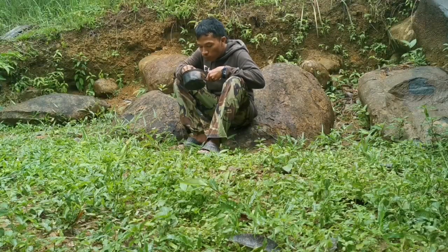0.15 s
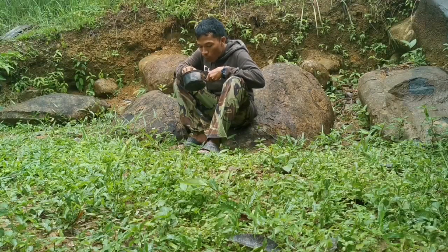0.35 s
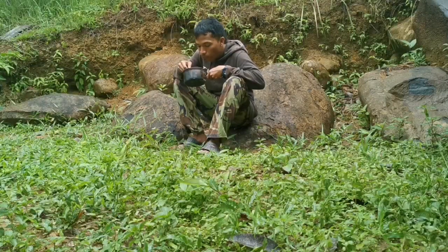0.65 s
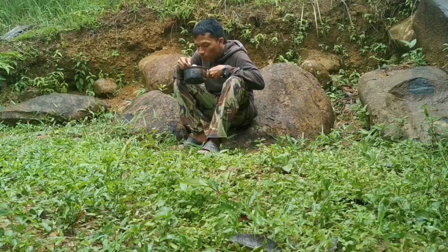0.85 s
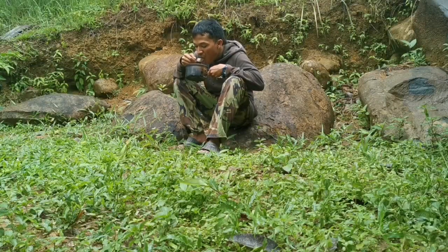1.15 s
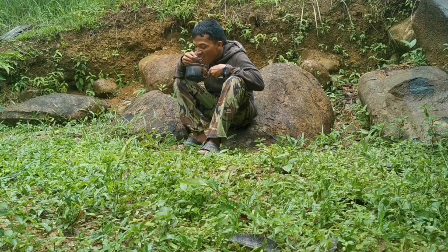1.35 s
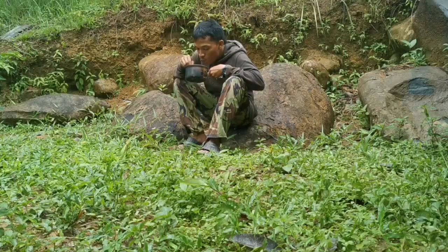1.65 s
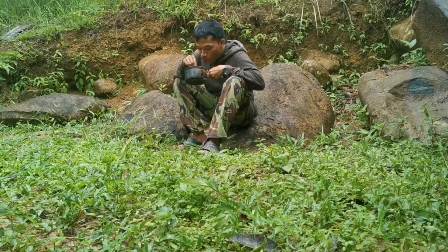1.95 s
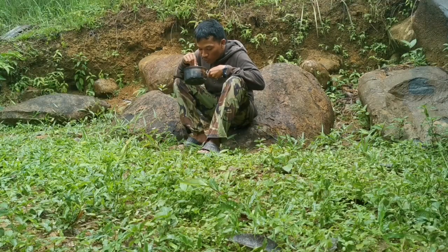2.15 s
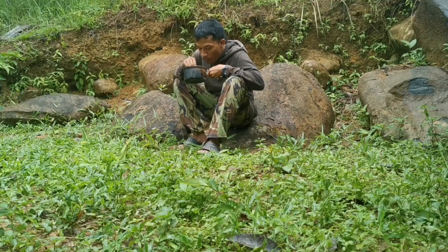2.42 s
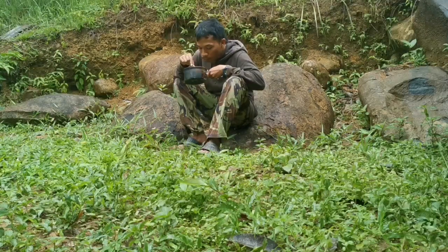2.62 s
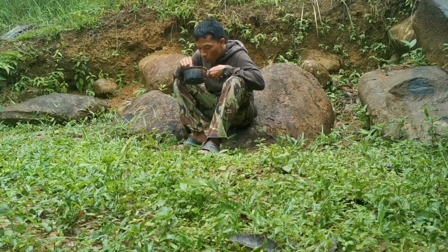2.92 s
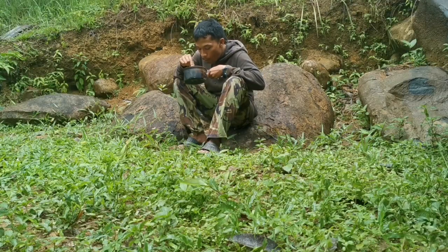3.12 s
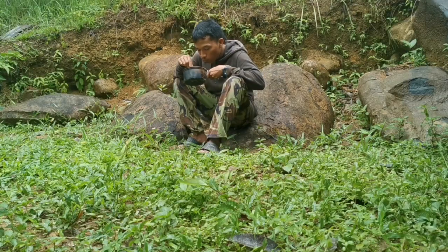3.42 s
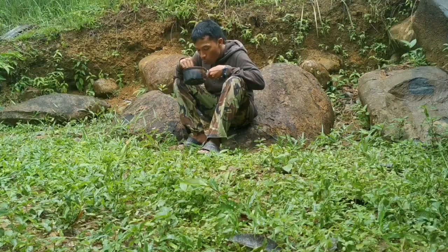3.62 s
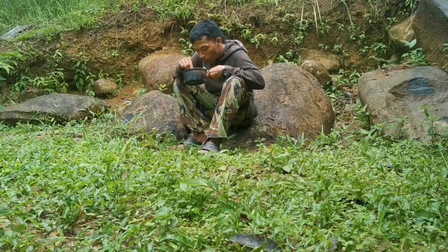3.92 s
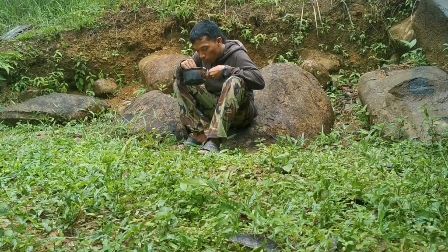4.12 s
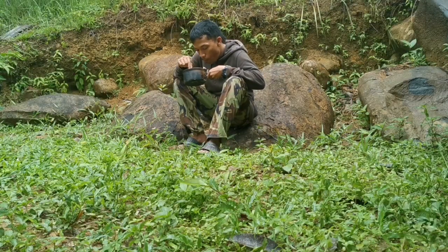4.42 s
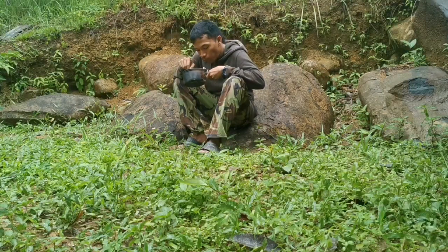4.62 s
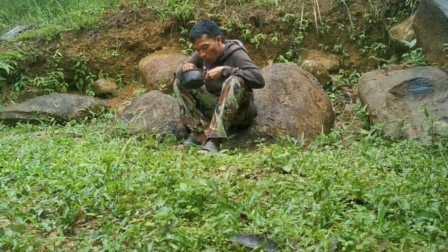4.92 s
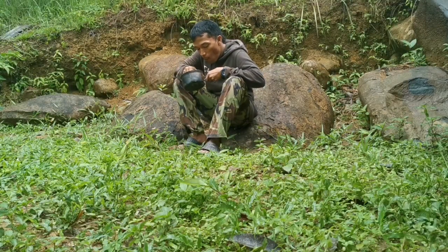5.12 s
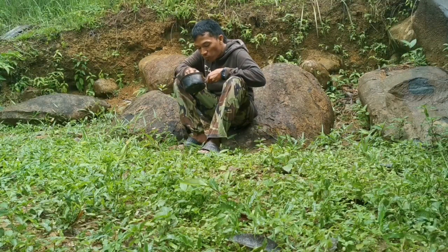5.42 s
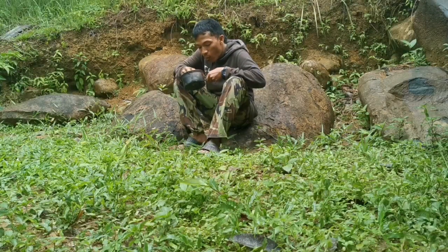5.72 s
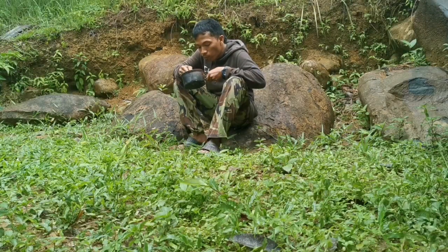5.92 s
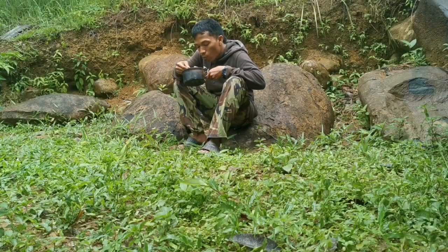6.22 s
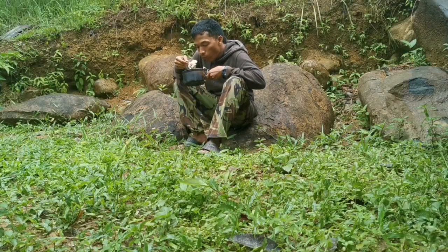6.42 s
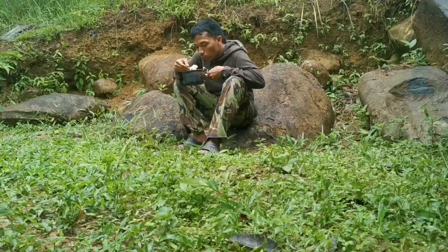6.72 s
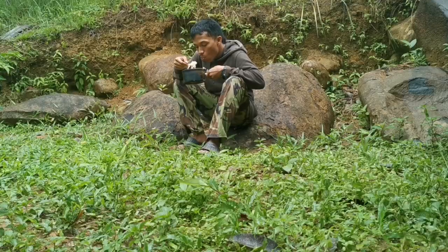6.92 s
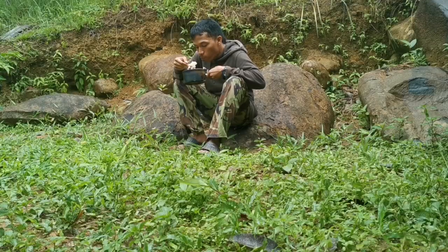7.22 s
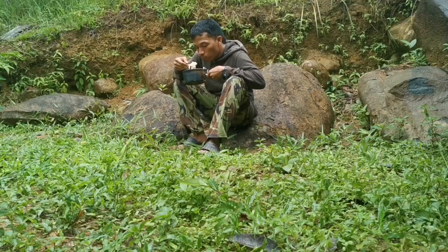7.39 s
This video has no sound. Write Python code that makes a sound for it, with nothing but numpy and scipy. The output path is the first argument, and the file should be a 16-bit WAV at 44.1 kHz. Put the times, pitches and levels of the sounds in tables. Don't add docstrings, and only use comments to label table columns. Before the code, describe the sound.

A quiet, wide stereo forest edge, heard from a camera microphone. From 0 s katydids give rough, buzzy chirps near 5 kHz, about four per second, running to the end over a soft, high, far insect chorus and thin distant cicadas. At 0.1 s a near cicada begins a piercing whine around 12.5 kHz with fainter lower overtones, beaded and flickering between ears, sliding slightly down until 3.25 s. It collapses into a noisy rasp fading by about 4 s. It returns at 4.6 s, gliding upward to the end at 7.5 s. A distant engine hums near 100 and 200 Hz, strongest around 1.5-3.6 s, over low traffic rumble. Two tiny high bird peeps sound on the right at 1.0 and 1.3 s. Soft, dull spoon-and-pot contacts occur near 0.8, 1.5, 1.9, 2.5, 4.3 (a sharper double tick), 6.8 and 7.5 s.

```python
import sys
import numpy as np
from scipy import signal
from scipy.fft import rfft, irfft, next_fast_len
from scipy.io import wavfile
from scipy.ndimage import uniform_filter1d, map_coordinates

SR = 44100
rng = np.random.default_rng(int(sys.argv[2]) if len(sys.argv) > 2 else 0)


def unload_wav(signal):
    wavfile.write(
        sys.argv[1],
        SR,
        np.round(np.clip(np.atleast_2d(signal).T, -1, 1) * 32767).astype(np.int16),
    )


def voltage_ratio(level):
    return 10 ** (np.asarray(level, float) / 20)


N = 332999
T = np.arange(N) / SR


def unit(x):
    return x / np.sqrt(np.mean(x ** 2, axis=-1, keepdims=True) + 1e-20)


def curves(rows):
    s, *cols = np.transpose(rows)
    return [np.interp(T, s, c) for c in cols]


def sounding(rows, fade):
    return np.clip(np.minimum(T - rows[0][0], rows[-1][0] - T) / fade + 1, 0, 1)


def swells(rows, rest_db):
    s, half, *db = np.transpose(rows)
    coarse = T[::64]
    bells = np.exp(-.5 * ((coarse - s[:, None]) / half[:, None]) ** 2)
    return np.array([np.interp(T, coarse, g) for g in voltage_ratio(rest_db) + voltage_ratio(db) @ bells])


def wobble(rate):
    knots = rng.standard_normal((2, int(N * rate / SR) + 4))
    return np.array([map_coordinates(k, [T * rate]) for k in knots])


def scattered(turns, rate):
    return np.cos(2 * np.pi * turns) * wobble(rate) + np.sin(2 * np.pi * turns) * wobble(rate)


def filtered(x, response):
    m = next_fast_len(N + 8192)
    return irfft(rfft(x, m) * response(np.fft.rfftfreq(m, 1 / SR)), m)[..., :N]


def resonance(hz, centre_hz, width_hz):
    return 1j * hz * width_hz / (centre_hz ** 2 - hz ** 2 + 1j * hz * width_hz)


def rush(spectrum, patchy_db):
    z = signal.stft(rng.standard_normal((2, N)), nperseg=512)[2]
    field = uniform_filter1d(rng.standard_normal(z.shape[1:]), size=6, axis=0)
    field = uniform_filter1d(field, size=14, axis=1)
    pair = signal.istft(z * voltage_ratio(patchy_db * field / field.std()), nperseg=512)[1][:, :N]
    f, db = np.transpose(spectrum)
    return unit(filtered(pair, lambda hz: voltage_ratio(np.interp(np.log(hz + 1), np.log(f), db, -120, -120))))


def lean(hz):
    return voltage_ratio(np.array([[.4], [-.6]]) * 850 / np.maximum(hz, 90))


def forest():
    # frequency in Hz, level in dB per Hz; the same for all three spectra
    rumble_spectrum = [(12, -29), (20, -7.5), (97, 0.5), (236, -4.5), (286, -4.5), (387, -11), (461, -14.5),
                       (558, -19), (644, -19), (900, -28.5), (1170, -30), (1980, -120)]
    chorus_spectrum = [(3600, -40), (3850, -19), (4150, -6), (4500, -6), (4800, -10), (5300, -14),
                       (5600, -19), (5950, -7), (6200, -.5), (6550, 0), (7350, -2.5), (7650, -18),
                       (8200, -40)]
    air_spectrum = [(300, -2.5), (600, -2), (1300, -5), (2200, -2.5), (3000, -2.5), (3700, -5), (8000, -7),
                    (10500, -8.5), (11700, -8), (12400, 2.5), (13000, -8), (13600, -10.5)]
    # time in seconds, rumble level in dB, chorus level in dB
    ambience = [(0.0, -67.5, -66), (0.67, -66, -69.5), (0.84, -68, -68), (3.07, -67, -68), (3.34, -64, -67),
                (4.81, -66, -68), (5.36, -68.5, -68.5), (7.55, -68.5, -68)]
    rumble_db, chorus_db = curves(ambience)
    common, own = rush(rumble_spectrum, patchy_db=1.5)
    rumble = voltage_ratio(rumble_db + 6.5) * np.array([1.06 * common + 0.43 * own, 0.64 * common - 0.28 * own])
    chorus = voltage_ratio(chorus_db + 7.5) * voltage_ratio([[1.2], [-1.2]]) * rush(chorus_spectrum, patchy_db=0.04)
    air = voltage_ratio(-61.5) * voltage_ratio([[.4], [-.4]]) * rush(air_spectrum, patchy_db=1.4)
    return rumble + chorus + air


def engine():
    # time in seconds, frequency in Hz
    firing_rate = [(0, 98.76), (.8, 99.53), (1.5, 100.8), (2.2, 103.7), (3, 104.9), (4, 105.8),
                   (4.8, 105.4), (5.5, 105.8), (6.5, 101.2), (7.55, 97.8)]
    # swell centre in seconds, half length in seconds, engine order, level in dB
    order_swells = [(0.385, 0.7, 1, -63.5), (0.582, 0.047, 1, -62.8), (0.994, 0.066, 1, -63),
                    (1.558, 0.27, 1, -54.5), (2.564, 0.3, 1, -61), (3.778, 0.36, 1, -57.5),
                    (4.655, 0.14, 1, -62), (5.151, 0.052, 1, -66), (5.914, 0.13, 1, -68.5),
                    (6.806, 0.06, 1, -61), (7.2, 0.033, 1, -64.5), (0.058, 0.12, 2, -60.5),
                    (1.34, 0.14, 2, -57), (1.74, 0.14, 2, -56), (2.274, 0.15, 2, -52),
                    (2.66, 0.062, 2, -55.5), (2.837, 0.09, 2, -51.5), (3.32, 0.12, 2, -50.5),
                    (3.6, 0.081, 2, -54.5), (3.939, 0.042, 2, -57), (4.44, 0.48, 2, -60.5),
                    (5.201, 0.096, 2, -64.5), (.47, 0.062, 2, -70), (6.4, 0.13, 2, -74.5),
                    (5.952, 0.077, 2, -63), (3.22, 0.046, 3, -70), (3.392, 0.02, 3, -61),
                    (3.539, 0.021, 3, -61), (3.936, 0.58, 3, -70), (4.315, 0.025, 3, -62),
                    (4.66, 0.025, 3, -74), (5.88, 0.026, 3, -65)]
    rate, = curves(firing_rate)
    turns = np.cumsum(rate) / SR
    gains = []
    for k in range(1, 4):
        rows = [(s, half, db) for s, half, order, db in order_swells if round(order) == k]
        gains.append(swells(rows, rest_db=-77)[0])
    gains.append(gains[-1] * voltage_ratio(-10.5))
    out = np.zeros((2, N))
    for k, gain in enumerate(gains, 1):
        drift, flutter = wobble(14)
        tone = np.sin(2 * np.pi * k * turns + 0.54 * drift)
        out += lean(k * rate) * np.sqrt(2) * gain * voltage_ratio(1.8 * flutter) * tone
    return out


def traffic():
    # start in seconds, end in seconds, start frequency in Hz, end frequency in Hz, level in dB
    hums = [(0, 7.55, 54, 60, -69), (.4, 1.1, 145, 140, -67), (2.3, 4.8, 142, 140, -70),
            (3.2, 5, 345, 343, -69), (4.9, 6.5, 152, 140, -66.5), (5.78, 5.96, 272, 270, -63),
            (6.3, 7.6, 288, 270, -68.5), (5.75, 6.05, 308, 303, -65), (6.95, 7.6, 112, 112, -66),
            (.45, .9, 297, 301, -70), (6.3, 7.2, 302, 294, -72)]
    out = np.zeros((2, N))
    for start, end, start_hz, end_hz, db in hums:
        hz = np.interp(T, [start, end], [start_hz, end_hz])
        turns = np.cumsum(hz) / SR
        hum = 0.94 * np.sin(2 * np.pi * turns) + 0.26 * scattered(turns, 8)[0]
        out += lean(hz) * voltage_ratio(db) * sounding([[start], [end]], fade=0.039) * hum
    return out


def far_cicadas():
    # time in seconds, tymbal rate in Hz, level of the shrill tone in dB
    singers = [
        [(0, 350, -72), (1.2, 343.6, -75), (2.5, 348.5, -65.5), (3.7, 345.5, -72), (4.6, 347, -82),
         (5.4, 350, -79)],
        [(2.4, 348.3, -74), (3.2, 350.4, -97), (4.2, 345, -75.5), (4.6, 348, -70), (5.2, 345.3, -72),
         (5.8, 347.6, -84)],
    ]
    # multiple of the tymbal rate, level in dB
    far_tones = [(9, -6), (18, -12), (36, 5), (37, -6)]
    out = np.zeros((2, N))
    for rows in singers:
        rate, level_db = curves(rows)
        turns = np.cumsum(rate) / SR
        song = sum(voltage_ratio(level_db + db) * scattered(round(k) * turns, 16) for k, db in far_tones)
        out += sounding(rows, fade=0.091) * song
    return out


def rasp():
    # time in seconds, level in dB
    rasps = [
        [(0, -69), (.1, -71.5), (.25, -83)],
        [(3.15, -83), (3.3, -62.5), (3.5, -65.5), (3.7, -68.5), (3.95, -81), (4.3, -84)],
    ]
    # frequency in Hz, width in Hz, level in dB
    abdomen = [(3070, 260, 2), (6240, 360, 4), (8900, 470, -7.5), (12240, 480, 7)]
    tuning = [1.03, 1]

    def body(hz):
        return sum(voltage_ratio(db) * resonance(hz, centre, width) ** 2 for centre, width, db in abdomen)

    grit = voltage_ratio(0.99 * wobble(13))
    noise = rng.standard_normal((2, N))
    out = np.zeros((2, N))
    for rows, tune in zip(rasps, tuning):
        voiced = unit(filtered(noise, lambda hz: body(hz / tune)))
        out += sounding(rows, fade=0.014) * voltage_ratio(curves(rows)[0] + 9.0) * grit * voiced
    return out


def katydid():
    # middle of the chirp in seconds, level in dB, middle frequency in Hz
    chirps = [(.1, -55, 4980), (.33, -54.5, 4990), (.56, -55.5, 5000), (.8, -54, 4950), (1.02, -53.5, 4970),
              (1.27, -56.5, 4950), (1.52, -55, 4830), (1.76, -53.5, 5000), (2.01, -62, 4800),
              (2.25, -57, 4850), (2.46, -60, 4940), (2.63, -60, 4800), (2.78, -55, 4750),
              (3.02, -53.5, 4750), (3.27, -55, 4750), (3.52, -55.5, 4732), (3.75, -55, 4613),
              (3.97, -67, 4700), (4.16, -56.5, 5040), (4.37, -55, 4950), (4.58, -54.5, 4900),
              (4.8, -56, 4982), (5.01, -53.5, 4930), (5.22, -54.5, 5000), (5.451, -55.5, 4950),
              (5.7, -54.5, 4900), (6.05, -61, 4850), (6.27, -59, 4940), (6.481, -59, 4900),
              (6.72, -59, 4820), (6.9, -54.5, 4776), (7.14, -55, 4790), (7.38, -56.5, 4800)]
    # time in seconds, level in dB
    crowd_level = [(0, -71), (.8, -67.5), (1.8, -66.5), (2.4, -71.5), (3.8, -71), (4.4, -68.5),
                   (5.2, -70.5), (6.2, -69.5), (7.55, -67)]
    # frequency in Hz, width in Hz, level in dB
    wings = [(4620, 400, -4), (5050, 520, 0)]
    sweep_hz, stroke_apart_s, pan_db = 896, .031, 2

    def wing_response(f):
        body = sum(voltage_ratio(db) * np.abs(resonance(f, centre, width)) ** 2 for centre, width, db in wings)
        return body / (1 + (f / 5330) ** 60)

    t, late = np.arange(SR // 40) / SR, np.arange(SR // 5) / SR
    out = np.zeros((2, N + SR))
    for centre, db, hz in chirps:
        sweep = np.cumsum(hz + sweep_hz * (.5 - t / t[-1])) / SR
        stroke = np.sqrt(np.abs(np.sin(np.pi * t / t[-1]))) * np.sin(2 * np.pi * sweep)
        chirp = np.zeros(SR // 5)
        for k, (lag, loud) in enumerate(rng.standard_normal((5, 2))):
            start = round((stroke_apart_s * k + .01 + .0022 * lag) * SR)
            stroke_db = db + 2.5 - .8 * (k - 2) ** 2 + .8 * loud
            chirp[start:][:len(t)] += voltage_ratio(stroke_db) * stroke
        chirp *= .15 + 1.75 * rng.standard_normal(len(chirp))
        tail = rng.standard_normal((2, len(late))) * voltage_ratio(-60 * late / .1)
        heard = signal.fftconvolve(chirp[None], tail / np.linalg.norm(tail[0]), axes=1)
        out[:, round((centre + .4) * SR):][:, :heard.shape[1]] += heard
    near = filtered(out[:, SR // 2:][:, :N], wing_response)
    crowd = unit(filtered(rng.standard_normal((2, N)), lambda f: resonance(f, 4580, 1100) ** 3))
    crowd_gain = voltage_ratio(curves(crowd_level)[0] + 0.71 * wobble(9))
    ears = voltage_ratio(2.4 + pan_db * np.array([[1], [-1]]))
    return ears * (voltage_ratio(4) * near + crowd_gain * crowd)


def cicada():
    # time in seconds, tymbal rate in Hz
    phrases = [
        [(.11, 356.7), (.63, 354.8), (1.47, 352.1), (2.34, 349.3), (2.96, 346.2), (3.21, 344.7), (3.26, 344.7)],
        [(4.6, 338.6), (4.68, 338.8), (5.29, 341.8), (5.61, 342.8), (6.6, 347.2), (7.18, 350.9), (7.38, 353.2),
         (7.55, 354.9)],
    ]
    # multiple of the tymbal rate, level in dB below the loudest moment,
    # extra dB at the onset, dB per Hz of rate
    weak_overtones = [(10, -39, -8, .9), (25, -50, 0, 0), (26, -38, 3, -.4), (27, -41, 13, -.6),
                      (28, -40, -6, 0), (34, -46, 0, 0), (35, -32, 5, -.2), (37, -31, -4, .2),
                      (38, -34, -14, 1.1)]
    # swell centre in seconds, half length in seconds, left level in dB, right level in dB
    shrill_swells = [(.1, 0.022, -62, -56), (0.18, 0.011, -64, -48.5), (.38, 0.013, -70, -49),
                     (0.32, 0.042, -68, -40), (0.47, 0.052, -57, -45.5), (0.56, 0.023, -49, -43),
                     (0.7, 0.074, -61, -52.5), (0.85, 0.056, -71, -52.5), (1.0, 0.04, -50, -73),
                     (1.13, 0.057, -85, -44), (1.22, 0.079, -43, -85), (1.37, 0.054, -63, -46),
                     (1.5, 0.035, -85, -54), (1.6, 0.055, -49, -85), (1.74, 0.057, -65, -50.5),
                     (1.89, 0.067, -68, -47.5), (2.04, 0.058, -45, -41), (2.19, 0.037, -51, -42),
                     (2.36, 0.017, -68, -85), (2.43, 0.042, -85, -56), (2.57, 0.027, -69, -62),
                     (2.63, 0.077, -63, -85), (2.82, 0.093, -75, -51), (2.96, 0.062, -51, -54),
                     (3.14, 0.025, -51, -64), (3.13, 0.077, -67, -44.5), (4.68, 0.029, -46, -47),
                     (4.77, 0.014, -85, -42), (4.84, 0.048, -47, -50), (5.05, 0.047, -63, -51),
                     (5.1, 0.03, -50, -77), (5.27, 0.068, -45.5, -45.5), (5.46, 0.029, -49.5, -56),
                     (5.53, 0.028, -87, -52), (5.64, 0.068, -54, -51.5), (5.74, 0.018, -61, -61),
                     (5.87, 0.051, -74, -48.5), (6.0, 0.026, -85, -48), (6.19, 0.1, -53, -44),
                     (6.36, 0.023, -58, -85), (6.43, 0.031, -85, -49.5), (6.54, 0.02, -69, -69),
                     (6.61, 0.032, -77, -49.5), (6.72, 0.11, -60, -78), (6.91, 0.018, -85, -48),
                     (7.04, 0.029, -53, -42), (7.13, 0.019, -45, -40), (7.32, 0.018, -49, -55),
                     (7.31, 0.25, -69, -63), (7.54, 0.071, -71, -52)]
    low_swells = [(0.29, 0.069, -85, -64), (0.38, 0.189, -67, -85), (0.65, 0.057, -85, -77),
                  (0.89, 0.1, -65, -85), (1.1, 0.05, -64, -70), (1.2, .04, -72, -64), (1.3, 0.12, -85, -61),
                  (1.55, 0.156, -71, -59), (1.89, 0.107, -65, -73), (2.12, 0.071, -72, -64),
                  (2.29, 0.073, -65, -64), (2.51, 0.089, -62, -67), (2.76, 0.111, -56, -85),
                  (2.91, 0.051, -66, -69), (3.16, 0.124, -78, -67), (4.76, 0.123, -85, -60),
                  (4.89, 0.034, -75, -85), (5.1, 0.082, -85, -67), (5.27, 0.073, -69, -69),
                  (5.46, 0.141, -72, -72), (5.8, 0.078, -85, -69), (5.97, 0.035, -68, -72),
                  (6.08, 0.176, -83, -65), (6.4, 0.084, -64, -69), (6.61, 0.107, -53, -85),
                  (6.89, 0.102, -64, -63), (7.07, 0.055, -71, -63), (7.28, 0.058, -85, -61),
                  (7.43, .05, -66, -72), (7.6, 0.25, -66, -85)]
    drum_swells = [(0.02, 0.12, -59, -63), (0.33, 0.1, -64, -65.5), (1.01, 0.3, -65, -70),
                   (1.33, 0.057, -66, -86), (1.7, 0.29, -65, -89), (2.05, 0.079, -68, -77),
                   (2.26, 0.11, -85, -62), (2.68, 0.19, -61, -67), (3.11, 0.13, -60, -85),
                   (5.11, 0.05, -81, -85), (5.42, 0.04, -82, -84), (5.8, 0.17, -64, -85),
                   (6.28, 0.15, -66, -85), (6.7, 0.12, -63, -76), (6.96, 0.13, -85, -72),
                   (7.48, 0.26, -63, -81)]
    side_swells = [(.22, .05, -70, -62), (.36, 0.059, -69, -60), (.52, .06, -70, -61), (.9, .06, -72, -64),
                   (1.12, .06, -62, -66), (1.35, .08, -64, -70), (1.6, 0.089, -74, -57),
                   (1.9, .05, -75, -67), (2.15, 0.053, -66, -58), (2.25, 0.077, -70, -76),
                   (2.58, .06, -70, -61), (2.85, 0.063, -68, -70), (3.1, 0.09, -68, -59),
                   (5, .03, -64, -64), (5.33, .05, -64, -65), (5.85, .06, -72, -68), (6.05, 0.07, -71, -66),
                   (6.3, .06, -73, -61), (6.72, 0.047, -68, -64), (7.05, .06, -66, -57),
                   (7.3, 0.092, -69, -70)]
    third_swells = [(.1, 0.029, -76, -60), (.72, .06, -74, -85), (1.08, .04, -76, -85),
                    (2.28, .06, -86, -80), (3.17, .05, -72, -82), (5.3, .09, -76, -72),
                    (5.6, 0.13, -75, -80)]
    # time in seconds, phase of right ear over left in rad
    shrill_turning = [(.15, -1.5), (.3, -2.2), (.45, .4), (.59, .1), (.74, -1.8), (1.04, -1.6), (1.18, -.2),
                      (1.33, -1.9), (1.63, -3), (1.92, -.4), (2.07, -2), (2.22, -.5), (2.4, 1.5),
                      (3.1, 2.4), (3.25, -.3), (4.65, 1.5), (4.79, .6), (5.06, .6), (5.33, 1.4),
                      (5.46, 2.6), (5.6, .7), (5.74, -3.4), (5.87, -1.6), (6, -1.4), (6.14, -3.8),
                      (6.28, -3.7), (6.96, -7), (7.09, -7.9), (7.36, -6.6)]
    low_turning = [(.15, -2.5), (.38, -1.8), (.5, -3.3), (.75, -2.6), (.95, -4.6), (1.18, -3.9),
                   (1.44, -7.8), (1.7, -7.7), (1.9, -8.7), (2.22, -7.6), (2.73, -7.9), (2.99, -11.1),
                   (3.25, -8.4), (4.65, .1), (4.8, .4), (4.95, 2.9), (5.12, 3.2), (5.36, 3.9), (5.6, 4.4),
                   (5.82, 8.4), (5.9, 10.4), (6.08, 10.9), (6.31, 8.2), (6.55, 9.5), (6.79, 11.9),
                   (7.02, 10.6), (7.35, 10.2), (7.5, 9)]
    drum_turning = [(.1, -.6), (.4, .3), (1, -.3), (1.2, 2.6), (1.6, 2.6), (1.8, .5), (2.2, -.3), (2.7, .5),
                    (2.9, 3), (3.15, 7.3), (5.4, 1.5), (5.9, 1.6), (6.4, -1), (6.8, -.4), (7.5, -.8)]
    apart = np.array([[0], [np.pi / 2]])

    shrill = np.sqrt(2) * swells(shrill_swells, rest_db=-66)
    low = np.sqrt(2) * swells(low_swells, rest_db=-76)
    drum = np.sqrt(2) * swells(drum_swells, rest_db=-89)
    side = np.sqrt(2) * swells(side_swells, rest_db=-90)
    third = np.sqrt(2) * swells(third_swells, rest_db=-95)
    shrill_lag, low_lag, drum_lag = (
        curves(rows)[0] * [[0], [1]] for rows in (shrill_turning, low_turning, drum_turning))
    out = np.zeros((2, N))
    for rows in phrases:
        rate, = curves(rows)
        turns = np.cumsum(rate) / SR
        angle = 2 * np.pi * turns
        beads = voltage_ratio(2.4 * wobble(32)[0])
        shrill_phase = shrill_lag + .5 * wobble(4)[0] + .15 * wobble(30)
        song = shrill * beads * np.sin(36 * angle + shrill_phase)
        song += .25 * shrill * scattered(36 * turns, 28)
        low_phase = low_lag + .5 * wobble(1.26)[0] + 0.096 * wobble(9.6)
        song += low * np.sin(9 * angle + low_phase)
        song += .08 * low * scattered(9 * turns, 20)
        drum_tone = np.sin(18 * angle + drum_lag + .5 * wobble(3)[0])
        song += drum * (drum_tone + .15 * scattered(18 * turns, 12))
        song += side * np.sin(37 * angle + shrill_lag)
        song += third * np.sin(27 * angle + apart)
        fresh = np.exp(-np.abs(T - rows[0][0]) / .22)
        for k, db, onset_db, tilt in weak_overtones:
            gain = voltage_ratio(db + onset_db * fresh + tilt * (rate - 348) - 42)
            song += gain * (.7 * np.sin(k * angle + apart) + .7 * scattered(k * turns, 7))
        song += voltage_ratio(-72) * scattered(36 * turns, 500)
        skirt = filtered(rng.standard_normal((2, N)), lambda hz: resonance(hz, 12580, 710) ** 2)
        song += voltage_ratio([[-70], [-66]]) * unit(skirt)
        out += sounding(rows, fade=0.07) * song
    return out


def pot():
    # start in seconds, frequency in Hz, width in Hz, decay in seconds, peak level in dB
    ticks = [(.78, 2750, 500, .05, -55), (.77, 1000, 500, .05, -60), (1.544, 550, 700, .028, -52),
             (1.54, 2600, 900, .02, -58), (1.89, 2600, 900, .05, -62), (2.49, 700, 300, .06, -60),
             (2.31, 9500, 2500, .05, -64), (2.83, 10500, 2500, .05, -62), (2.9, 10500, 2500, .05, -64),
             (4.331, 2300, 2200, .012, -53), (4.337, 2500, 2800, .012, -50), (4.348, 3200, 700, .015, -57),
             (4.363, 3200, 700, .015, -58), (4.445, 2500, 1500, .03, -62), (6.73, 1500, 1200, .1, -62),
             (6.86, 3000, 2000, .12, -59), (7.504, 2200, 2000, .05, -52), (7.506, 4200, 1800, .04, -55)]
    out = np.zeros((2, N))
    for s, hz, width_hz, decay, db in ticks:
        age = np.clip((T - s) / decay, 0, None)
        puff = rng.standard_normal((2, N)) * age * np.exp(-4 * age)
        ring = filtered(puff, lambda f: resonance(f, hz, 0.7 * width_hz) ** 2)
        out += voltage_ratio(db + 3) * ring / np.abs(ring).max()
    return out


def bird():
    # start in seconds, length in seconds, frequency in Hz, level in dB
    peeps = [
        (1.026, 0.05, 8160, -66),
        (1.263, .065, 8200, -63.5),
    ]
    out = np.zeros(N)
    for s, length, hz, db in peeps:
        gate = np.clip(np.minimum(T - s, s + length - T) / 0.0024, 0, 1)
        out += voltage_ratio(db) * gate * np.sin(2 * np.pi * hz * T)
    return out * voltage_ratio([[-14], [6]])


def scene():
    insects = cicada() + rasp() + far_cicadas() + katydid()
    return insects + bird() + engine() + traffic() + pot() + forest()


def low_pass(x):
    return signal.sosfilt(signal.butter(12, 13780, fs=SR, output="sos"), x)


def record(dry):
    # time in seconds, frequency in Hz
    top_edge = [(0, 13650), (1.8, 13600), (3.1, 13330), (3.7, 13550), (4.6, 13330), (6.3, 13380),
                (7.55, 13650)]
    hz, t, z = signal.stft(dry, SR, nperseg=2048)
    edge = curves(top_edge)[0] + 190 * wobble(30)[0]
    edge = edge[np.minimum(t * SR, N - 1).astype(int)]
    edge = edge // 172 * 172 + 86
    heard = signal.istft(z * (hz[:, None] < edge), SR, nperseg=2048)[1][:, :N]
    return low_pass(heard)


dry = scene()
out = record(dry)
unload_wav(out)
```